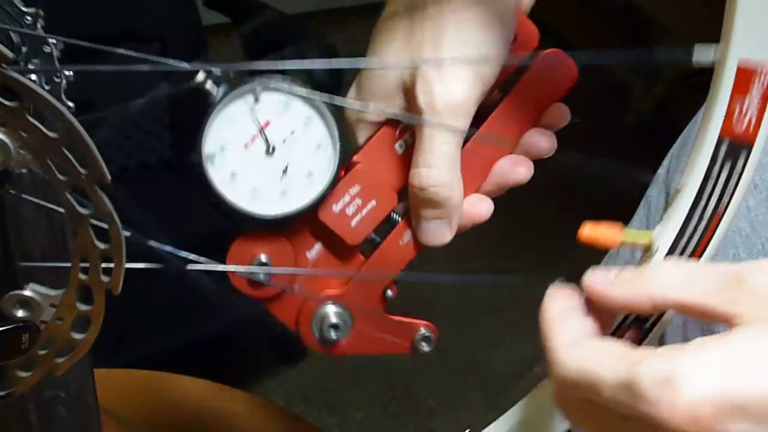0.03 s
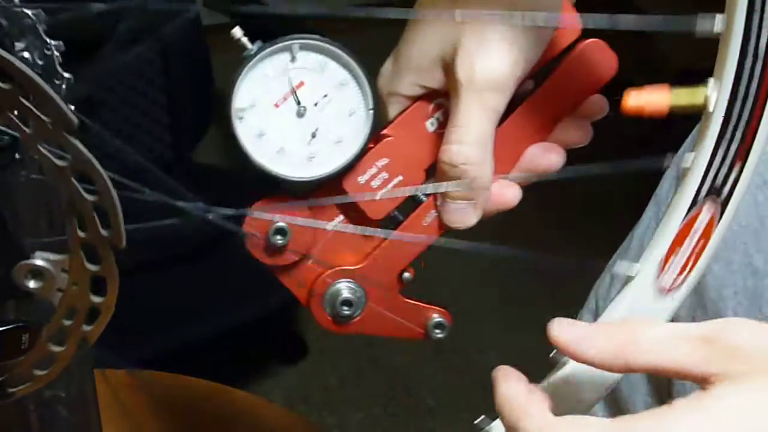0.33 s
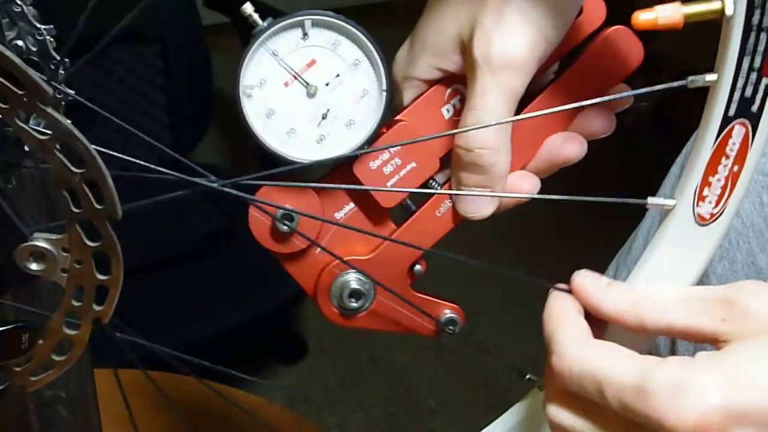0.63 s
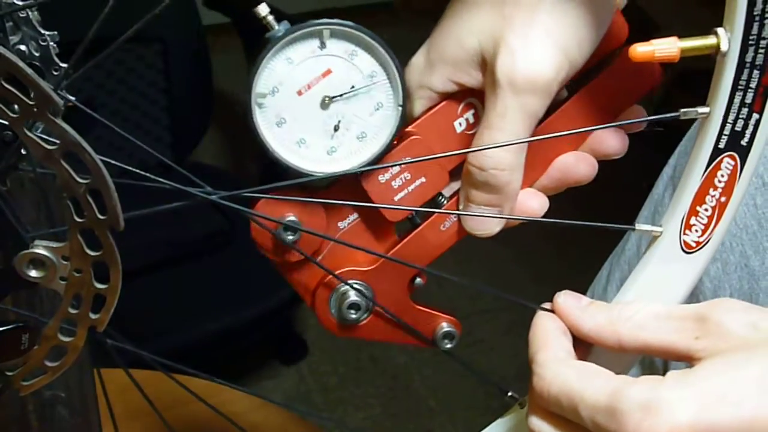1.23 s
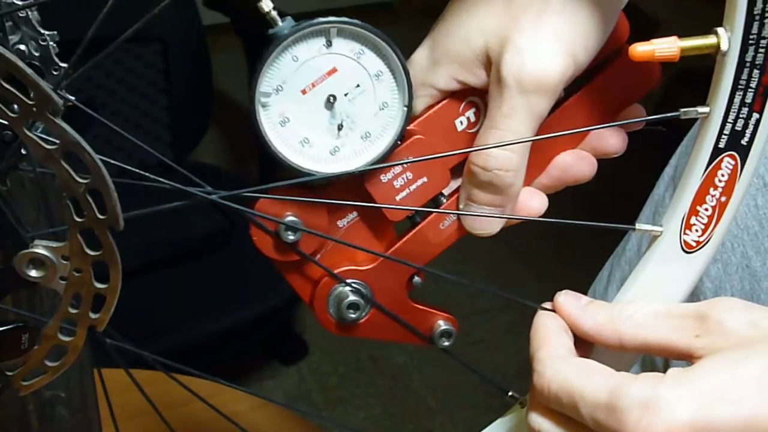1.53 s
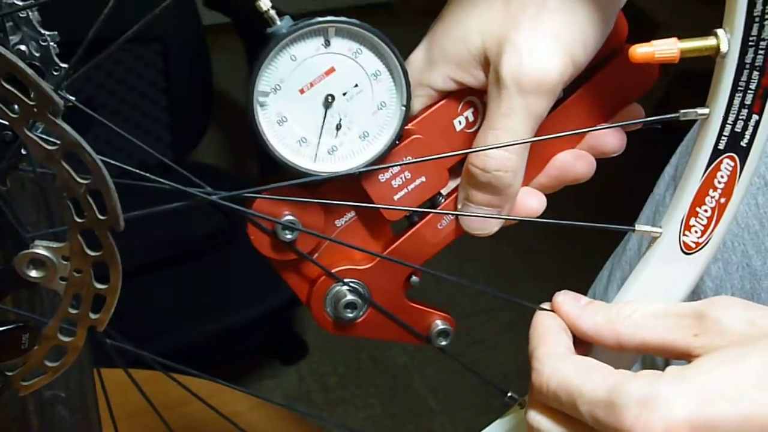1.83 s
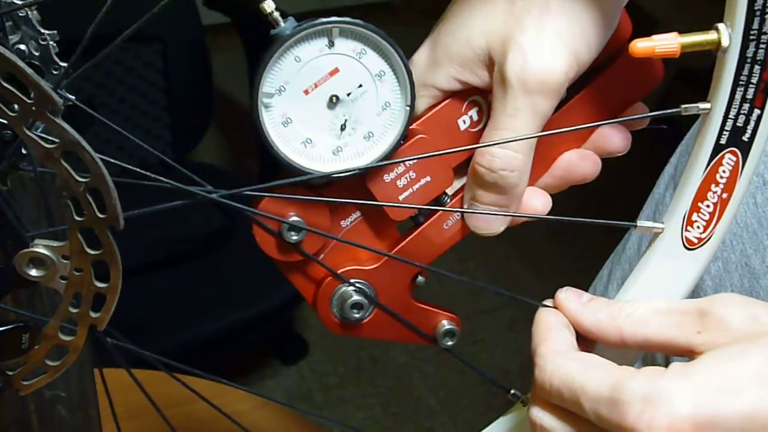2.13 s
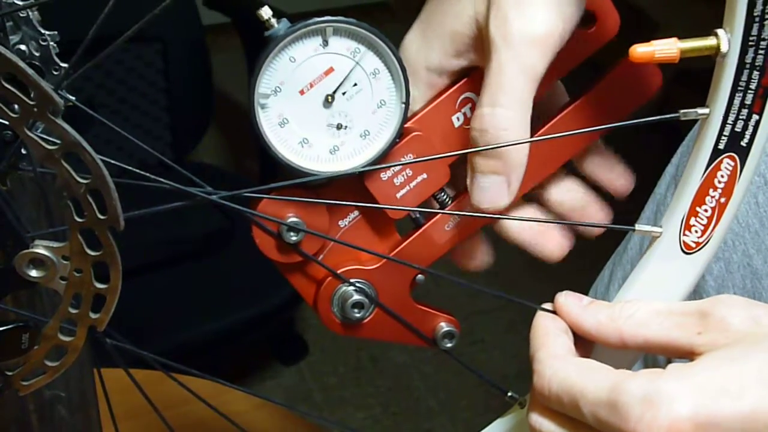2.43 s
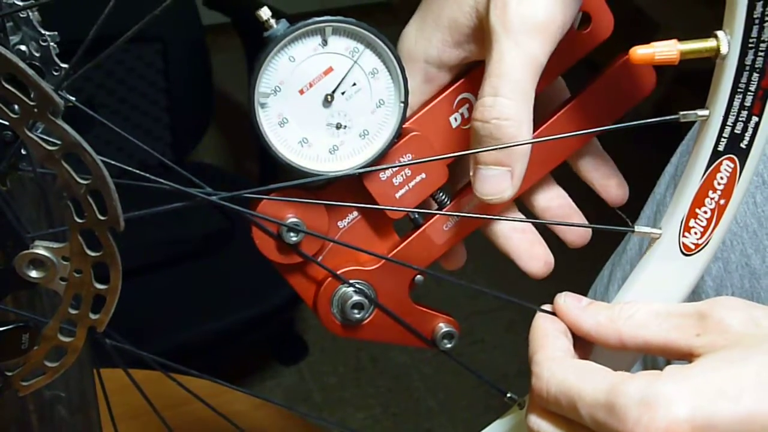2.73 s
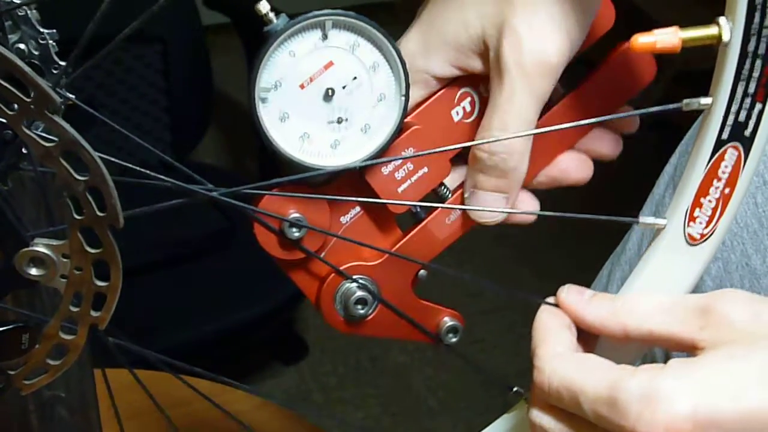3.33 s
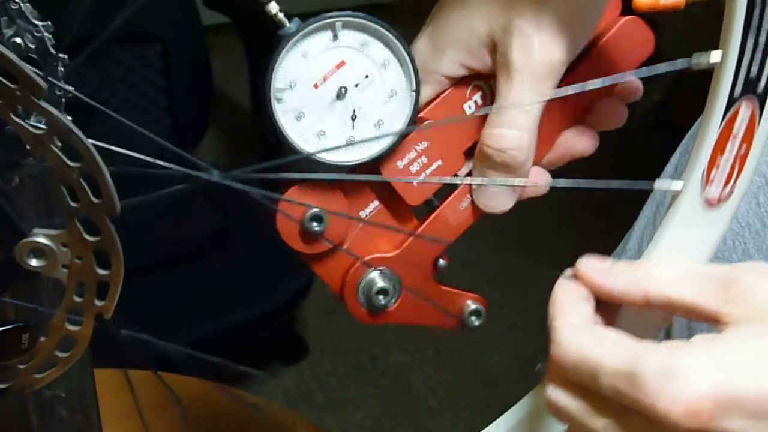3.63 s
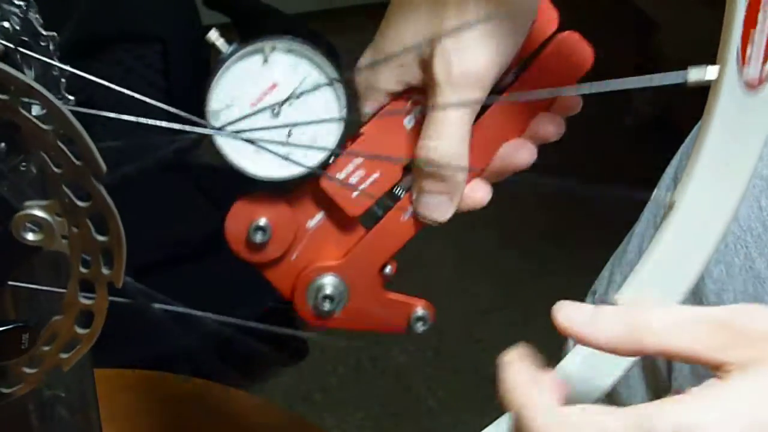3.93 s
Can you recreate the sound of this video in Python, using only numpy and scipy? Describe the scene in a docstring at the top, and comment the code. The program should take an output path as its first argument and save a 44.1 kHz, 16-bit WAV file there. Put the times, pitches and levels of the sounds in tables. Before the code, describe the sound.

Steel pins of a tension gauge click and rattle on a bicycle spoke, knocking the wheel softly; later the gauge slides off with tiny scrapes. Heard close in a small room, over a swelling low hum, a fan and hiss.

```python
"""A small room, one small microphone near a bicycle wheel. A dial tension meter is hooked onto a spoke:
its steel pins click on the spoke, and the wheel answers with a low, ringing knock. Later the meter
scrapes lightly as it is slid off. Underneath lie a swelling low hum, fan noise and the hiss of the
microphone, whose response has a few narrow notches."""
import sys
import numpy as np
from scipy import signal
from scipy.fft import rfft, irfft, next_fast_len
from scipy.io import wavfile
from scipy.ndimage import map_coordinates

SR = 44100
rng = np.random.default_rng(int(sys.argv[2]) if len(sys.argv) > 2 else 0)


def to_wav(s):
    """Save 16-bit WAV."""
    ch = np.atleast_2d(s).T  # columns
    pcm = np.round(np.clip(ch, -1, 1) * 32767)  # PCM
    wavfile.write(sys.argv[1], SR, pcm.astype(np.int16))


N = 176400

# spectrum of steel meeting steel, in clicks and scrapes alike: f/Hz, level/dB
CONTACT_SPECTRUM = [(300, -23.5), (1100, 2.5), (1900, -4), (2700, 2.5), (3400, -2.5), (4300, 5.5),
                    (5400, -3.5), (6700, -1), (7700, -9.5), (8400, -19.5)]
STEEL_ROOM_DB = -5  # reverberation against the direct sound


def amp(db):
    """Decibels to gain."""
    return 10 ** (np.asarray(db) / 20)


def unit(x):
    """Scale to rms 1."""
    return x / np.sqrt(np.mean(x ** 2) + 1e-20)


def along(points, hz):
    """Interpolate (f/Hz, value) points on a log frequency axis."""
    freqs, values = np.transpose(points)
    return np.interp(np.log(hz + 1), np.log(freqs + 1), values)


def wobble(rate):
    """A smooth random curve with rate knots a second."""
    return map_coordinates(rng.standard_normal(int(N * rate / SR) + 4), [np.arange(N) * rate / SR])


def filtered(x, response):
    """Filter x by a gain given as a function of f/Hz."""
    size = next_fast_len(len(x) + 8192)
    return irfft(rfft(x, size) * response(np.fft.rfftfreq(size, 1 / SR)), size)[:len(x)]


def noise(spectrum, size):
    """Coloured noise of rms 1."""
    return unit(filtered(rng.standard_normal(size), lambda hz: amp(along(spectrum, hz))))


def tone(hz, db):
    """A sine that follows a frequency curve, at rms level db."""
    return np.sqrt(2) * amp(db) * np.sin(2 * np.pi * np.cumsum(hz) / SR)


def add(track, start, x):
    """Mix x into the track, start seconds in."""
    part = track[round(start * SR):][:len(x)]
    part += x[:len(part)]


def ring(modes, t):
    """Damped modes whose levels differ a little from blow to blow."""
    scatter_db = rng.standard_normal(len(modes))
    return sum(amp(db + scatter - 60 * t / t60) * np.sin(2 * np.pi * hz * t)
               for (hz, db, t60), scatter in zip(modes, scatter_db))


def room(x):
    """The small room's answer: a short tail in which the treble dies first."""
    # reverberation time: f/Hz, t60/s
    decay = [(150, 0.35), (1000, 0.39), (3000, 0.15), (8000, 0.099)]
    hz, t, spectra = signal.stft(rng.standard_normal(SR // 2), SR, nperseg=256)
    tail = signal.istft(spectra * amp(-60 * t / along(decay, hz)[:, None]), SR, nperseg=256)[1]
    tail *= np.clip(np.arange(len(tail)) / SR / .0062 - .5, 0, 1)  # reflections build from 3 to 9 ms
    return signal.fftconvolve(x, tail / np.linalg.norm(tail))[:len(x)]


def microphone_hiss():
    """The small microphone's own steady noise."""
    # hiss spectrum: f/Hz, relative level/dB
    spectrum = [(300, -8), (1300, -0.5), (2700, 3), (4000, -0.5), (5500, -1), (7000, -6), (7800, -10.5),
                (8500, -26.5)]
    return amp(-62.5) * noise(spectrum, N)


def fan():
    """A fan in the background: a low rush of air with faint, unsteady tones."""
    # fan tones: f/Hz, level/dB
    lines = [(500.6, -66.5), (544, -67), (4204, -82), (4926, -79.5), (7885, -87.5), (8110, -88)]
    # moving air: f/Hz, relative level/dB
    air = [(20, -10.5), (45, 5), (110, 0.5), (200, 3), (380, -1), (530, -2.5), (750, -4.5), (1200, -11),
           (1900, -39), (4000, -48)]
    whine = sum(tone(hz * (1 + .003 * wobble(40)), db + 2 * wobble(7)) for hz, db in lines)
    return whine + amp(-53 + .89 * wobble(5.35)) * noise(air, N)


def hum():
    """A low hum that swells and fades, drifting slightly in pitch."""
    # course of the hum: t/s, level/dB
    swells = [(0.0, -63), (0.03, -49), (0.34, -47.5), (0.42, -58), (0.49, -50.5), (0.52, -55), (0.57, -47),
              (0.62, -60), (1.12, -52), (1.15, -60), (1.26, -47.5), (1.6, -54), (1.69, -44.5), (1.85, -59),
              (1.95, -44), (2.23, -50.5), (2.34, -41.5), (2.41, -41.5), (2.52, -57.5), (2.67, -38.5),
              (2.86, -45.5), (2.94, -40), (3.27, -37), (3.41, -46.5), (3.66, -53.5), (3.73, -74),
              (3.85, -61.5), (4.0, -59)]
    level_db = np.interp(np.arange(N) / SR, *np.transpose(swells))
    return tone(hz=54.54 + .8 * wobble(3.5), db=level_db)


def meter_scrapes():
    """The meter slides on the spoke in tiny slips; each scrape favours one resonance of the steel."""
    # light scrapes: centre t/s, half length/s, level/dB, squeak f/Hz
    slides = [(1.349, .008, -53, 4310), (2.301, 0.0078, -58, 3220), (3.58, 0.009, -61.5, 4360),
              (3.609, 0.0064, -60.5, 4340), (3.621, 0.0052, -55, 2730), (3.635, 0.009, -57, 1880)]
    slips_per_s, squeak_width_hz, squeak_db = 3000, 100, 4
    t, out = np.arange(N) / SR, np.zeros(N)
    for centre, half_length, db, squeak_hz in slides:
        slips = rng.standard_normal(N) * (rng.random(N) < slips_per_s / SR)
        grit = unit(filtered(slips, lambda hz: amp(along(CONTACT_SPECTRUM, hz))))
        squeak = unit(filtered(slips, lambda hz: 1 / (1 + 2j * (hz - squeak_hz) / squeak_width_hz)))
        swell = amp(db) * np.exp(-.5 * ((t - centre) / half_length) ** 2)
        out += unit(grit + amp(squeak_db) * squeak) * swell
    return out + amp(STEEL_ROOM_DB) * room(out)


def wheel_knock(t, db, tilt):
    """The struck spoke sets the wheel's low modes ringing, tilted in dB per octave."""
    # modes of the laced wheel: f/Hz, relative level/dB, t60/s
    modes = [(131, -15, .4), (148, -8, .12), (213, -16, .6), (228, -1, .12), (269, 0, .12), (312, -12, .08),
             (390, -5, .12), (660, -23, .12)]
    pivot_hz, rise_s = 240, .0059
    tilted = [(hz, level + tilt * np.log2(hz / pivot_hz), t60) for hz, level, t60 in modes]
    return amp(db + 1.5) * ring(tilted, t) * (1 - np.exp(-t / rise_s))


def meter_clicks():
    """Each contact of pin and spoke cracks, rings the pin and the steel, and knocks the wheel."""
    # contacts, levels relative: t/s, tick level/dB, treble shelf/dB, steel ring/dB, pin ring/dB,
    # pin f/Hz, knock level/dB, knock tilt/(dB per octave)
    contacts = [(0.6953, -36.5, 6, -14.5, -7, 4420, -37, -5.5),
                (0.6997, -36.5, 0.5, -7, 4, 4390, -41, -4.5), (0.8694, -36, 7, -4, 3, 4390, -36.5, -8.5),
                (0.8786, -47, -16, -9, 13, 2920, -59, 1.5), (0.884, -39.5, -18, -0.5, 2, 4350, -45.5, 10),
                (0.8935, -59, -5.5, -4, 3, 4050, -52, 1), (0.904, -41.5, 13, -12, -8, 4300, -36.5, 2.5),
                (0.9082, -39.5, -1, -14, 2, 4170, -30.5, 3), (.9160, -48, -1, -12, 8.5, 3650, -35, 7),
                (.9230, -42.5, -7, 3, 1, 3760, -36.5, 3.5), (.9340, -58.5, -8, -4, -3, 4300, -28.5, -4.5),
                (0.9532, -41.5, -5.5, 0, 11, 4400, -38, -12), (1.0587, -38, 4.5, -8, 0, 4680, -43, -8),
                (1.0785, -43.5, 2.5, -13.5, 1, 4630, -41.5, -13),
                (1.3373, -45.5, -2.5, -4.5, 13, 4550, -68, -4), (1.3807, -37, 3.5, -8, -4, 2650, -41, -11),
                (1.4040, -46, 5, -19, -11, 4400, -45.5, 7.5)]
    # modes of the steel of meter and spoke: f/Hz, relative level/dB, t60/s
    steel_modes = [(1244, -12, .28), (1880, -15, .12), (2410, -14, .1), (2652, -10, .12), (2830, -11, .09),
                   (3770, -8, .07), (4000, -7, .07), (4257, -7, .12), (5300, -11, .07), (6250, -11, .08),
                   (6800, -9, .05), (7520, -11, .05)]
    crack_t60_s, pin_t60_s, pin_beat_hz = .033, .04, 110
    shelf_hz, rise_s, wheel_room_db = 5650, .00031, -11
    t, out = np.arange(SR // 2) / SR, np.zeros(N)
    for start, db, treble_db, steel_db, pin_db, pin_hz, knock_db, tilt in contacts:
        crack = noise(CONTACT_SPECTRUM, len(t)) * amp(-1.5 - 60 * t / crack_t60_s)
        pin = ring([(pin_hz, pin_db, pin_t60_s), (pin_hz - pin_beat_hz, pin_db - 8, pin_t60_s)], t) / 2
        steel = amp(steel_db) * ring(steel_modes, t)
        tick = filtered(crack + pin + steel, lambda hz: amp(treble_db / (1 + (shelf_hz / (hz + 1)) ** 8)))
        tick *= amp(db) * (1 - np.exp(-t / rise_s))
        knock = wheel_knock(t, knock_db, tilt)
        reverb = room(amp(STEEL_ROOM_DB) * tick + amp(wheel_room_db) * knock)
        add(out, start, tick + knock + reverb)
    return out


def scene():
    """All sources at the one microphone."""
    return (meter_clicks() + meter_scrapes() + hum() + fan() + microphone_hiss())[None]


def record(dry):
    """The microphone adds narrow notches, a steep band limit and a small steady offset."""
    # notches in the microphone's response: f/Hz, half width/Hz
    notches = [(1410, 110), (1595, 208), (2150, 74), (8000, 87)]
    top_hz, offset = 8750, .0114

    def response(hz):
        """Notches times low-pass."""
        dips = [(f * f - hz * hz) / (f * f - hz * hz + 2j * hz * width) for f, width in notches]
        return np.prod(dips, axis=0) / (1 + (hz / top_hz) ** 120)
    return filtered(dry[0], response)[None] + offset


dry = scene()
out = record(dry)
to_wav(out)
```